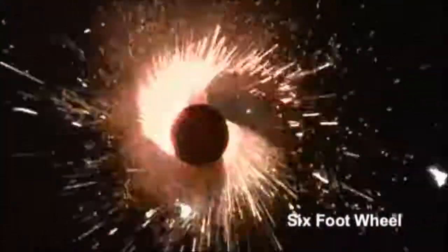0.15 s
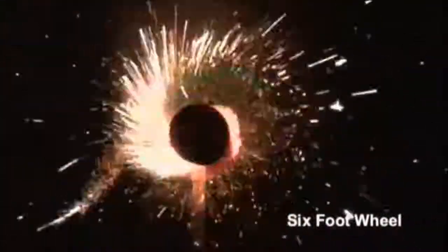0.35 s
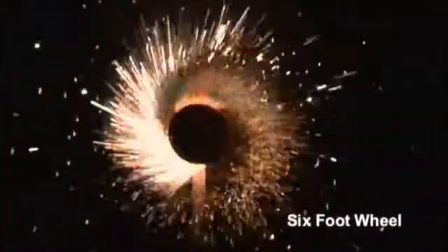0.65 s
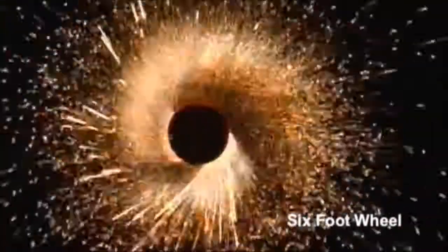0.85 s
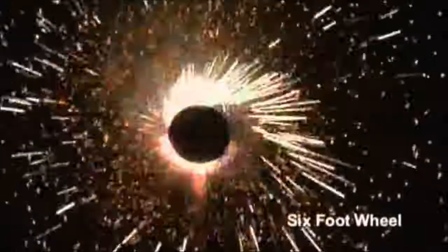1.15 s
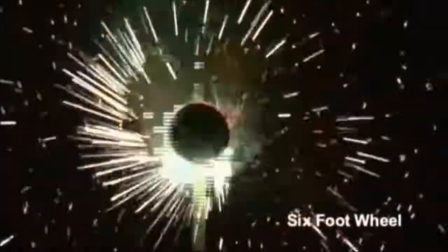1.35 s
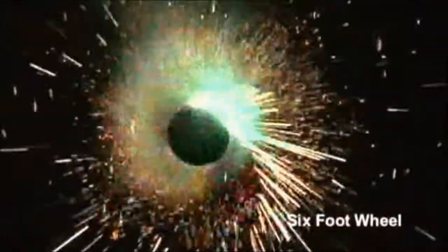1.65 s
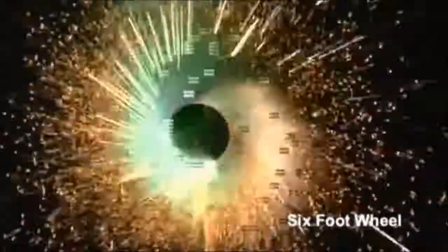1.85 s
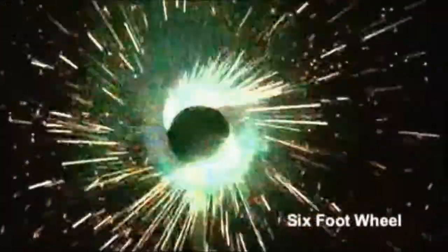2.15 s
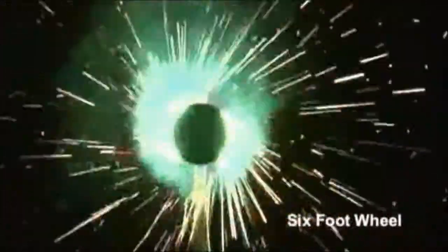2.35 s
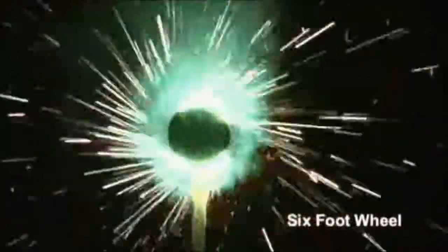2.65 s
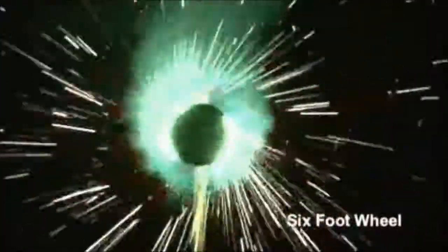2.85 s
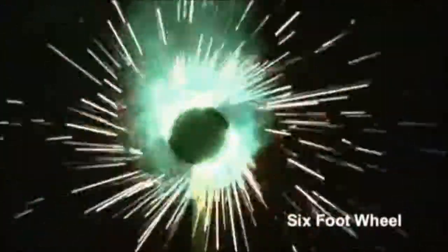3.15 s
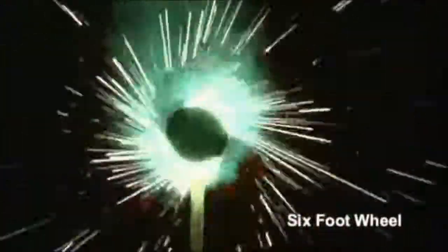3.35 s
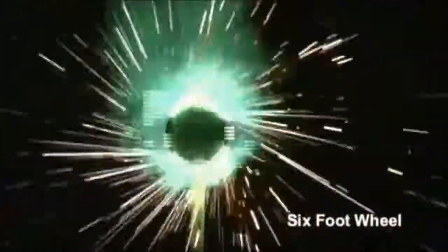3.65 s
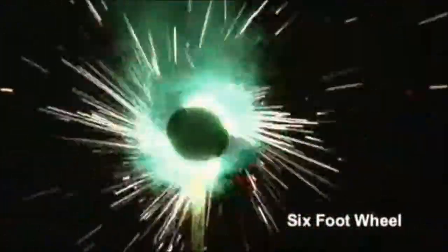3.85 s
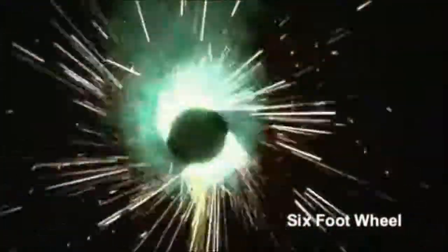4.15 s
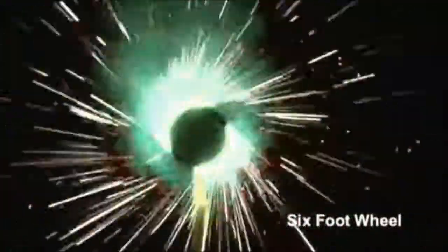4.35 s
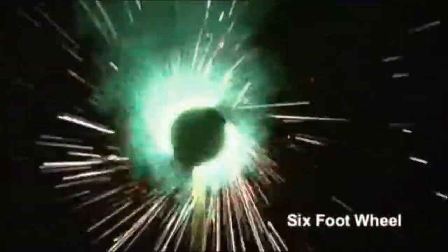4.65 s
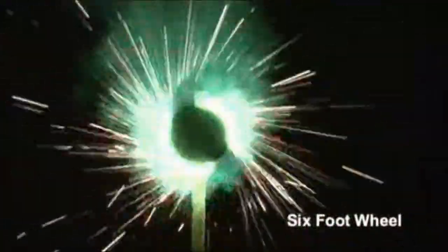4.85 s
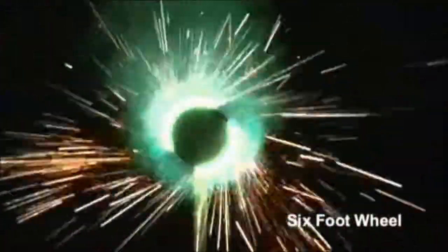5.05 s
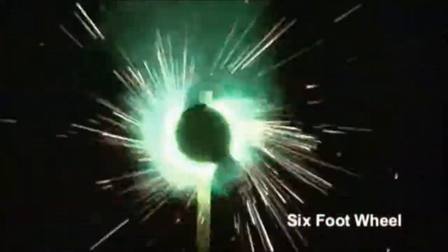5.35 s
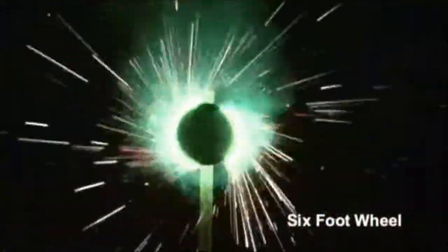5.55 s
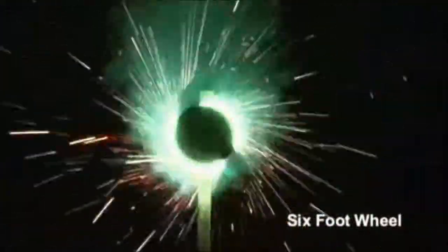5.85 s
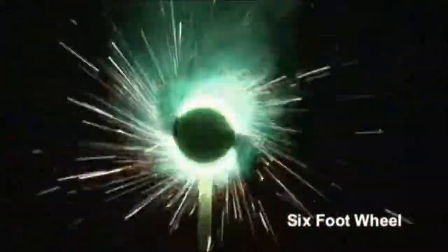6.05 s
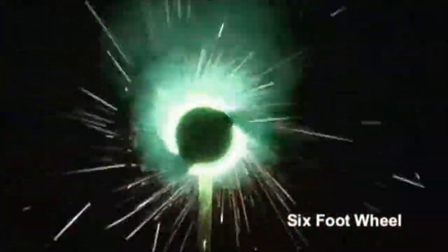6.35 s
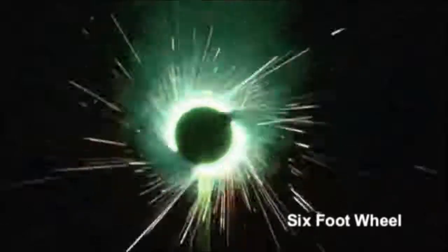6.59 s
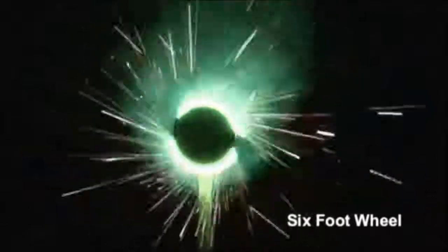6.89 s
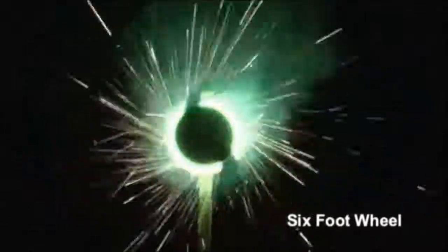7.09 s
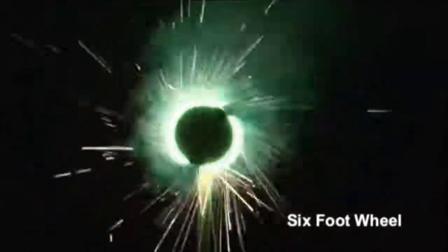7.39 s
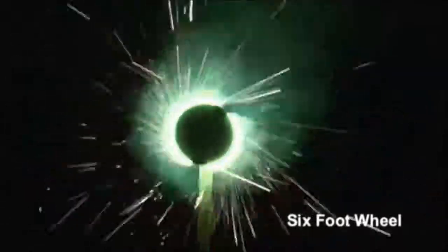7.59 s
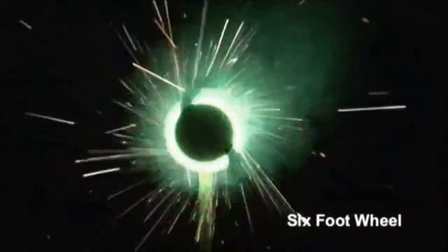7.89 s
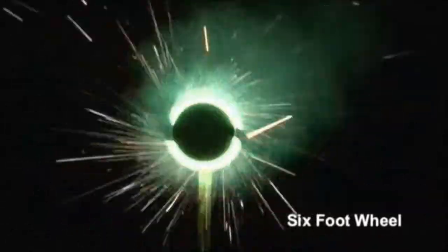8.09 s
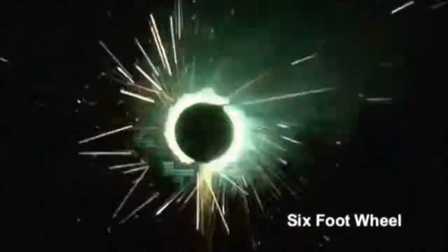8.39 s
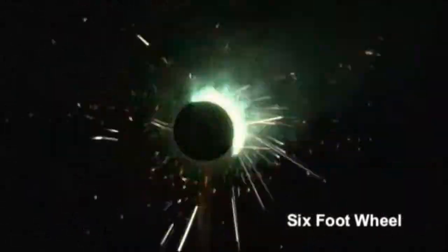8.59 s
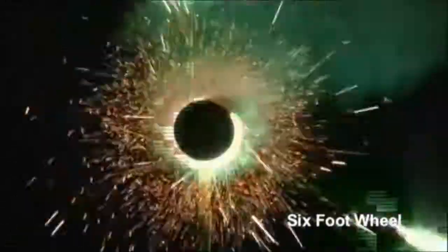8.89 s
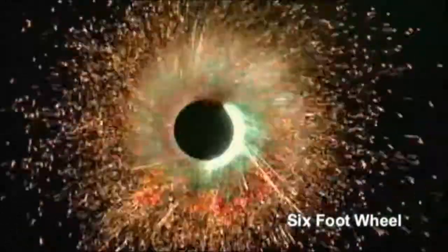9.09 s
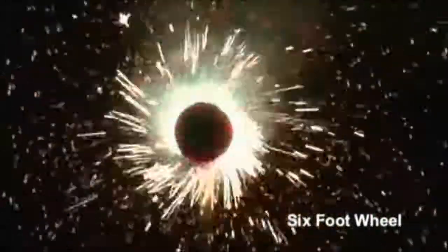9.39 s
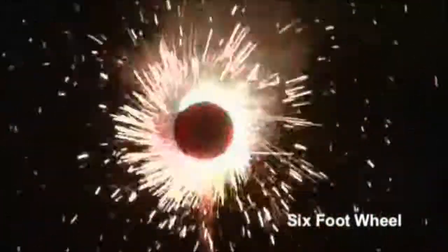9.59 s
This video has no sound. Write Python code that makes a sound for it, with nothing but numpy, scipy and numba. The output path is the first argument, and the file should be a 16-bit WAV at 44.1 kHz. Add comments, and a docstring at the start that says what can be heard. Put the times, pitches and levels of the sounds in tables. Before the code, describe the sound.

A dense, breathy spray of burning gas and sparks flutters rapidly as a firework wheel turns, speeding up over time. After uneven early lulls, the rush grows fuller and brighter, with a double low thump near the middle and occasional short cracks. Late on the jet weakens, several pops burst close together, and the flapping fire returns as rotation slows slightly. Open night air, faint bass rumble, small mono microphone.

```python
"""A firework wheel, driven by two opposite rocket tubes on its rim, spins up from 10 to 21 turns a second.
Each jet is filtered noise with crackling sparks; its ground echo swings every turn, so the hiss swirls.
White sparks and flapping flames yield to a rushing green flame (noise in two climbing resonances), with
lulls at changes of charge. Pops (noise bursts), then soft low thumps (sines), join over a faint noise rumble.
Late on, the green goes out, the white flames come back and the wheel slows slightly."""
import sys
import numpy as np
from scipy.fft import rfft, irfft, next_fast_len
from scipy.io import wavfile
from scipy.ndimage import uniform_filter1d, map_coordinates
from numba import njit

SR = 44100
rng = np.random.default_rng(int(sys.argv[2]) if len(sys.argv) > 2 else 0)


def dump_mix(stems):
    """Bounce the given channels to the path in sys.argv[1] as a 16-bit WAV at rate SR."""
    frames = np.atleast_2d(stems).T  # one column per channel
    limited = np.clip(frames, -1, 1)  # hard clip at full scale
    pcm = np.round(limited * 32767).astype(np.int16)
    wavfile.write(sys.argv[1], SR, pcm)


N = 429093
TIME = np.arange(N) / SR


def undb(db):
    """Decibels to amplitude gain."""
    return 10 ** (np.asarray(db) / 20)


def unit(x):
    """Scale to rms 1."""
    return x / np.sqrt(np.mean(x ** 2))


def steady(x):
    """Hold the rms near 1 over every half second."""
    return x / np.sqrt(uniform_filter1d(x ** 2, SR // 2))


def curve(rows, axis=1):
    """Interpolate one column of a table, sample by sample; column 0 is time."""
    rows = np.array(rows)
    return np.interp(TIME, rows[:, 0], rows[:, axis])


def shape(x, gain):
    """Filter by a gain that is a function of frequency."""
    size = next_fast_len(len(x))
    hz = np.fft.rfftfreq(size, 1 / SR) + 1  # +1 avoids 0 Hz
    return irfft(rfft(x, size) * gain(hz), size)[:len(x)]


def colour(x, points):
    """Filter by a (Hz, dB) curve, interpolated over log frequency."""
    hz, db = np.transpose(points)
    return shape(x, lambda f: undb(np.interp(np.log(f), np.log(hz), db)))


def walk(rate_hz):
    """Smooth random wander of rms 1: held random steps, averaged twice."""
    hold = int(SR / rate_hz)
    steps = np.repeat(rng.standard_normal(N // hold + 1), hold)
    smooth = uniform_filter1d(uniform_filter1d(steps, hold), hold)
    return unit(smooth[:N])


@njit
def resonance(x, hz, damping):
    """State-variable band-pass whose centre may move."""
    y, band, low = np.empty(len(x)), 0., 0.
    for i in range(len(x)):
        g = np.tan(np.pi * hz[i] / SR)
        v = (band + g * (x[i] - low)) / (1 + g * (g + damping))
        band, low, y[i] = 2 * v - band, low + 2 * g * v, v
    return y


def plateau(start_s, rise_s, hold_s, fall_s):
    """An envelope that climbs from 0 to 1, holds and falls back."""
    age = TIME - start_s
    falling = 1 - (age - rise_s - hold_s) / fall_s
    return np.clip(np.minimum(age / rise_s, falling), 0, 1)


def lull_db():
    """How far the burn sinks where one charge dies and the next one catches."""
    # start_s, sink_s, hold_s, recover_s, depth_db
    lulls = [(0.32, 0.13, .27, 0.26, 5), (1.06, .22, 0.052, 0.44, 9.5), (1.582, 0.21, 0.051, 0.13, 3),
             (2.02, 0.14, .08, 0.42, 2.5), (8.45, 0.15, .3, 0.33, 5)]
    return sum(depth_db * plateau(start_s, sink_s, hold_s, recover_s)
               for start_s, sink_s, hold_s, recover_s, depth_db in lulls)


def green_share(lit_s=0.91, rise_s=0.68, out_s=8.6, fall_s=.2, share=0.67, fade_s=5.7):
    """Power share of the green flame: it flares up, slowly gives way to plain gas and goes out."""
    age = TIME - lit_s
    alight = np.clip(np.minimum(age / rise_s, (out_s - TIME) / fall_s), 0, 1)
    return np.clip(share * alight * np.exp(-age / fade_s), 0, 1)


def sparks(per_second, spread_db):
    """Tiny bursts of metal grains: random impulses, many weak, a few strong."""
    sizes = undb(spread_db * np.minimum(rng.exponential(size=N), 6))
    struck = rng.random(N) < per_second / SR
    return unit(struck * sizes * rng.choice([-1, 1], N))


def jet(sparks_db=-12, green_damping=0.58, upper_ratio=1.42, upper_db=0.3, sputter_db=0.56):
    """One tube: turbulent gas and sparks, mixed with the green flame's two broad resonances."""
    # hz, gain_db
    gas_colour = [(60, -35.5), (180, -21.5), (300, -20.5), (540, -7), (690, -6.5), (850, -1.5), (1130, -3),
                  (1450, 2), (2100, -0.5), (3000, -2), (4200, 1.5), (7000, -5.5), (8600, -11),
                  (16000, -22.5)]
    # time_s, centre_hz: lower green resonance, climbing as the tube burns down
    green_pitch = [(1.3, 2070), (2.3, 2080), (3.6, 2330), (5, 2420), (6.2, 2540), (8.4, 3480)]
    turbulence = rng.standard_normal(N)
    crackle = undb(sparks_db) * sparks(per_second=2500, spread_db=3)
    gas = unit(colour(turbulence + crackle, gas_colour))
    rush = 0
    for ratio, db in [(1, 0), (upper_ratio, upper_db)]:
        hz, damping = ratio * curve(green_pitch), float(green_damping)
        once = resonance(rng.standard_normal(N), hz, damping)
        rush = rush + undb(db) * unit(resonance(once, hz, damping))
    green = green_share()
    mix = np.sqrt(1 - green) * gas + np.sqrt(green) * unit(rush)
    return mix * undb(sputter_db * walk(rate_hz=70))


def whirl(x, turn, aim=0.074, grass_hz=10000, beam_db=0.8, beam_turn=0.02):
    """Ground echo, latest and strongest with the nozzle at the top; the jet is louder on one side of the turn."""
    lag_s, swing_s, ground_gain = .000935, .000078, .58
    height = np.cos(2 * np.pi * turn)  # 1 at the top, -1 at the bottom
    delay = (lag_s + swing_s * height) * SR
    echo = map_coordinates(x, [np.arange(N) - delay], order=3)
    # grass swallows the treble
    echo = shape(echo, lambda f: ground_gain / np.sqrt(1 + (f / grass_hz) ** 4))
    beam = undb(beam_db * np.cos(2 * np.pi * (turn - beam_turn)))
    return (x + (1 + aim * height) * echo) * beam


def wheel(roar_hz=1600, sizzle_hz=7700, rush_trim_db=-0.25, roar_trim_db=0, sizzle_trim_db=1.3,
          flutter_db=0.58, cough_db=0.62, cough_depth_db=5):
    """Two tubes half a turn apart; the burn sets their roar, rush and sizzle, and each band flutters a little."""
    # time_s, turns_per_s
    spin = [(0.0, 10.27), (0.6, 10.79), (1.1, 11.06), (1.7, 12.41), (2.3, 13.15), (3.3, 13.9), (4.5, 15.38),
            (6.5, 18.63), (8.5, 21.11), (9.73, 19.44)]
    # time_s, second_tube_power_share (0-1)
    handover = [(0, 0.67), (.5, 0.1), (1.5, 0.33), (2.1, 0.42), (3.6, 0.57), (6.2, 0.57), (7.6, 0.7),
                (8.3, 0.8), (8.6, 1), (9.1, 0.76), (9.6, 0.75)]
    # time_s, burn_db, roar_rel_db, sizzle_rel_db: slow course of the burn, before trims and lulls
    burn_course = [(0.0, -22.5, -12, -14), (0.3, -22.5, -8.5, -13.5), (2.0, -22.5, -5.5, -10.5),
                   (2.9, -22.5, -6.5, -12), (4.1, -20, -11, -10.5), (5.2, -20, -10.3, -9.5),
                   (6.2, -18.5, -13.5, -10.2), (6.8, -20, -12.5, -8.5), (7.55, -20, -14.5, -3.5),
                   (8.3, -21, -11.5, -3.5), (8.55, -20, -8.5, -8), (9.27, -20.5, -11, -9.5),
                   (9.6, -23.5, -10.5, -6)]
    start_turn = .25
    roar_lull_share, sizzle_lull_share = 0.65, 0.99  # fraction of a lull's depth each band follows

    turn = start_turn + np.cumsum(curve(spin)) / SR
    second = np.clip(curve(handover), 0, 1)
    x = np.sqrt(1 - second) * whirl(jet(), turn) + np.sqrt(second) * whirl(jet(), turn + .5)

    roar = shape(x, lambda f: 1 / (1 + (f / roar_hz) ** 8))
    sizzle = shape(x, lambda f: 1 / (1 + (sizzle_hz / f) ** 8))
    rush = x - roar - sizzle
    lull = lull_db()
    roar_db = roar_trim_db + curve(burn_course, axis=2) - roar_lull_share * lull
    sizzle_db = sizzle_trim_db + curve(burn_course, axis=3) - sizzle_lull_share * lull
    bands = [(rush, rush_trim_db - lull), (roar, roar_db), (sizzle, sizzle_db)]

    weak = np.clip(lull / cough_depth_db, 0, 1)  # a weak burn coughs in short spurts
    burn = undb(curve(burn_course) + cough_db * weak * walk(rate_hz=45))
    return burn * sum(steady(band) * undb(db + flutter_db * walk(rate_hz=80)) for band, db in bands)


def flame(level_db=-47, dip_db=-6, white_out_s=2.0, white_back_s=8.5, change_s=0.32, flicker_db=1.5):
    """Soft flapping of white-spark fire swung through the air: low noise, weaker from white_out to white_back."""
    flap_colour = [(60, -29), (120, -8.0), (190, -1.5), (290, 0.0), (420, -9), (900, -22.0)]  # hz, gain_db
    body = unit(colour(rng.standard_normal(N), flap_colour))
    dip = np.clip(np.minimum(TIME - white_out_s, white_back_s - TIME) / change_s, 0, 1)
    return body * undb(level_db + dip_db * dip + flicker_db * walk(rate_hz=27))


def rumble(rest_db=-66, unrest_db=1):
    """Faint, uneven bass noise of the open night air that swells now and then."""
    # hz, gain_db
    air_colour = [(20, -17), (45, -3), (72, 4.5), (110, -6), (200, -23), (600, -41)]
    # peak_s, half_width_s (to 1/e of the power), level_db
    swells = [(1.85, 0.095, -54), (3.1, 0.76, -62), (4.55, 0.53, -52.5), (5.5, .2, -57), (6.8, .45, -62),
              (9.52, .11, -49)]
    power = undb(rest_db) ** 2
    for peak_s, half_width_s, db in swells:
        power = power + undb(db) ** 2 * np.exp(-((TIME - peak_s) / half_width_s) ** 2)
    air = unit(colour(rng.standard_normal(N), air_colour))
    return air * np.sqrt(power) * undb(unrest_db * walk(rate_hz=12))


def pops(crack_fade_s=0.0059, thud_fade_s=0.0084, thud_hz=210):
    """Each burning lump bursts with a short crack and a dull thud: decaying band-passed noise."""
    # start_s, crack_db, crack_hz, crack_half_damping, thud_db (levels before the decay)
    bursts = [(1.679, -33, 1100, .5, -40), (5.144, -20, 910, 0.35, -34), (7.518, -16.5, 1100, 0.19, -52),
              (8.547, -28, 1000, 0.59, -36), (8.734, -28, 1000, 0.37, -55), (8.849, -15, 3000, 1., -42),
              (9.166, -22, 984, 0.18, -48), (9.305, -17.5, 980, 0.18, -27)]
    out = np.zeros(N)
    t = TIME[:SR // 10]
    thud_centre = np.full(len(t), float(thud_hz))
    for start_s, crack_db, hz, half_damping, thud_db in bursts:
        noise, centre = rng.standard_normal((2, len(t))), np.full(len(t), float(hz))
        damping = 2. * half_damping
        crack = unit(resonance(resonance(noise[0], centre, damping), centre, damping))
        thud = unit(resonance(noise[1], thud_centre, 0.37))
        start = int(start_s * SR)
        out[start:start + len(t)] += undb(crack_db) * crack * np.exp(-t / crack_fade_s)
        out[start:start + len(t)] += undb(thud_db) * thud * np.exp(-t / thud_fade_s)
    return out


def thumps(rough=0.16):
    """Soft bass sines that swell and die in a few cycles, with a rough noise edge."""
    # peak_s, swell_s, fade_s, pitch_hz, level_db (swell and fade to 1/e)
    notes = [(3.998, .02, 0.018, 80, -31), (4.06, 0.048, .03, 73.6, -21), (4.19, .025, .03, 72, -40),
             (4.89, 0.017, .02, 72, -43), (5.152, 0.01, 0.01, 80, -39), (7.03, .02, .02, 74, -45),
             (7.355, .025, .05, 72, -45), (9.503, .032, 0.043, 72, -29)]
    out = np.zeros(N)
    edge = unit(colour(rng.standard_normal(N), [(40, -8), (200, 9), (330, -4), (700, -43)]))
    for peak_s, swell_s, fade_s, hz, db in notes:
        t = TIME - peak_s
        envelope = np.exp(-(t / np.where(t < 0, swell_s, fade_s)) ** 2)
        out += undb(db) * envelope * (np.sin(2 * np.pi * hz * t) + rough * edge)
    return out


def scene():
    """Sum of all sources, alike in both ears."""
    mono = wheel() + flame() + rumble() + pops() + thumps()
    return np.tile(mono, (2, 1))


def record(dry, top_hz=15800):
    """Fixed peaks and hollows over the whole scene and a steep top edge; the hollows near 4.4 and 5.6 kHz
    deepen the steady notches of the ground echo."""
    # centre_hz, width_hz, gain_db: peaks and hollows, those near 4.4 and 5.6 kHz deepening the echo's notches
    ripples = [(1257, 156, -3), (1720, 95, -3.5), (1840, 73, 1), (3980, 200, 2), (4380, 610, -4.5),
               (5590, 220, -3.5), (6060, 170, 2), (9580, 620, -4.5), (12900, 800, 1.5)]

    def response(f):
        ripple_db = sum(db / (1 + (2 * (f - hz) / width) ** 2) for hz, width, db in ripples)
        return undb(ripple_db) * np.clip((top_hz - f) / 100 + .5, 0, 1)
    return np.array([shape(channel, response) for channel in dry])


dry = scene()
out = record(dry)
dump_mix(out)
```